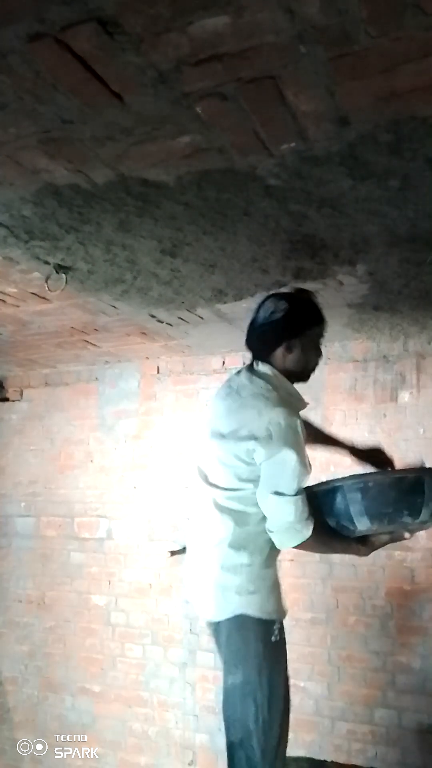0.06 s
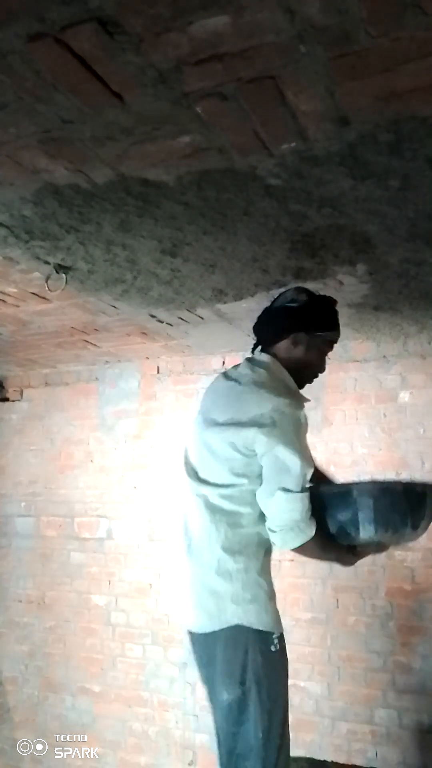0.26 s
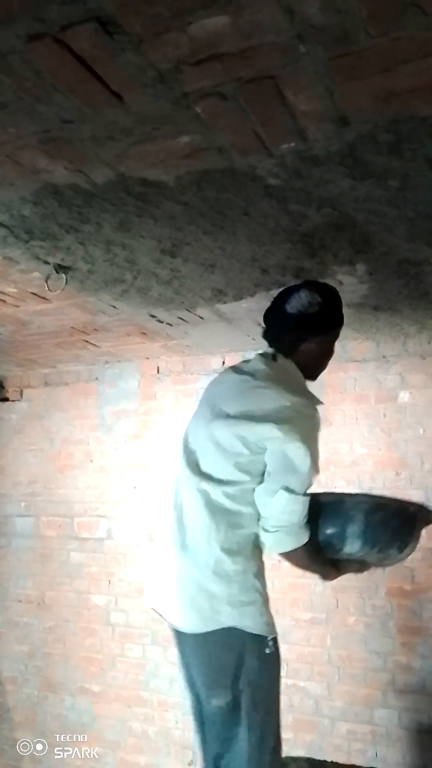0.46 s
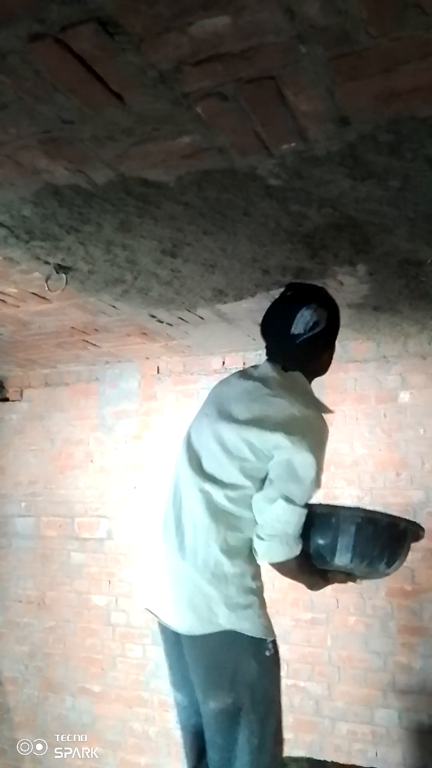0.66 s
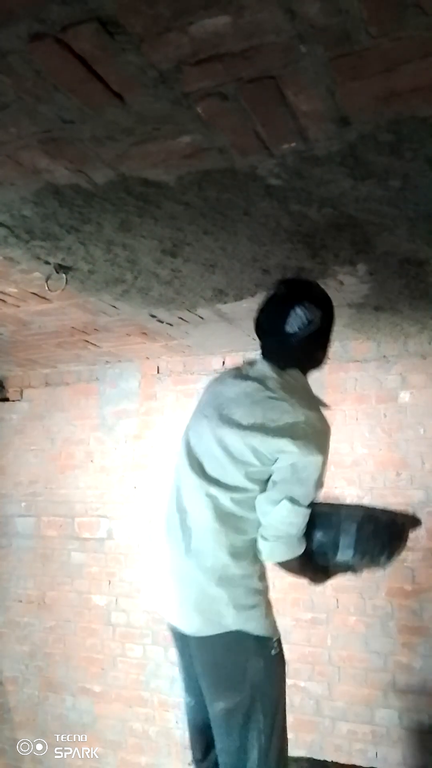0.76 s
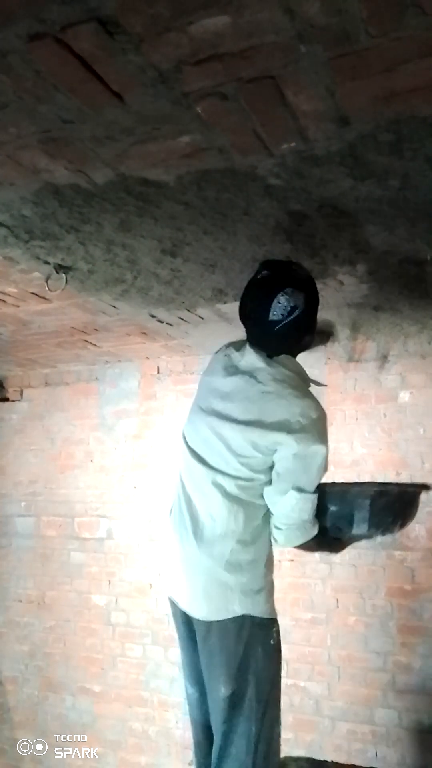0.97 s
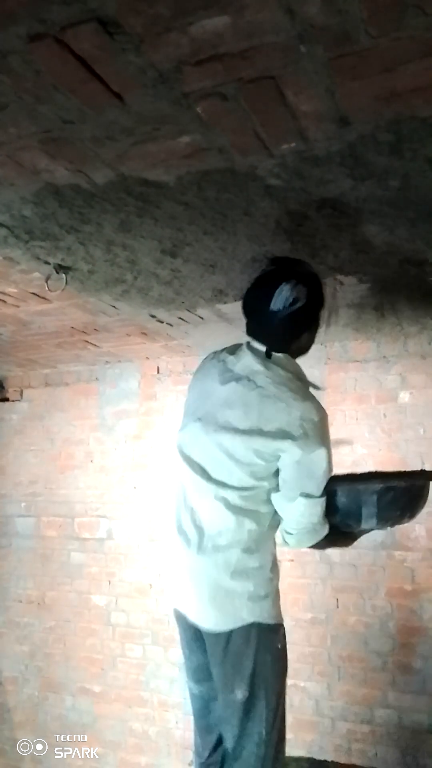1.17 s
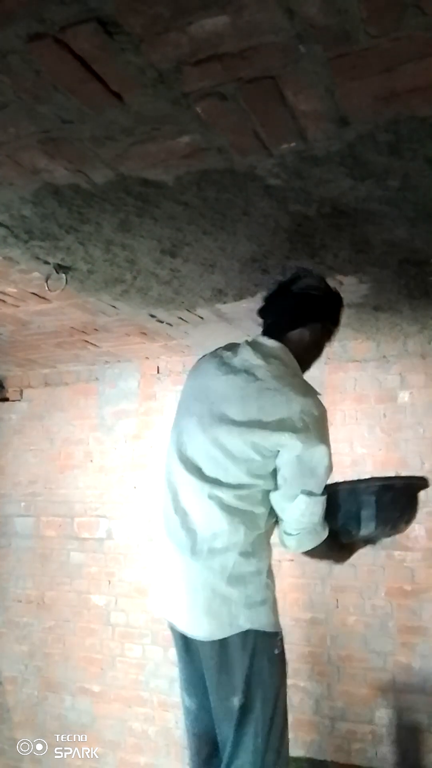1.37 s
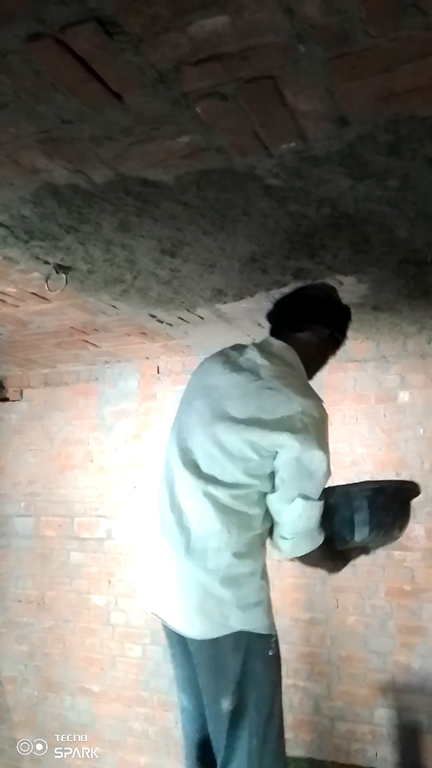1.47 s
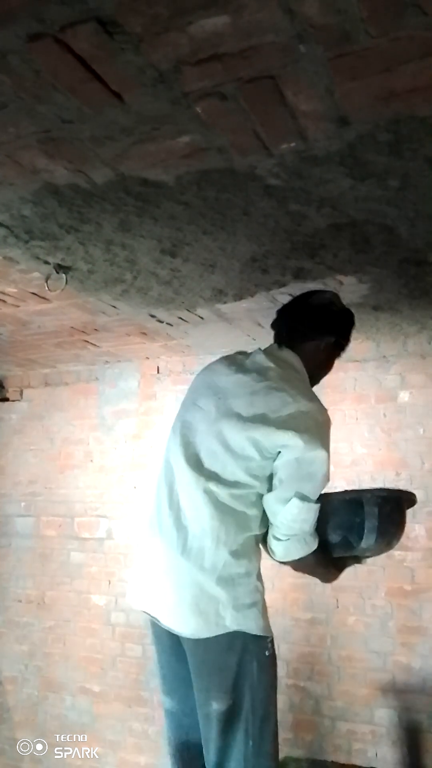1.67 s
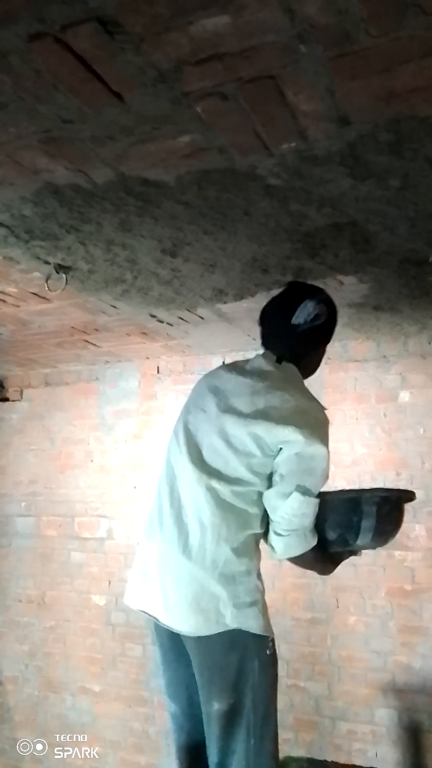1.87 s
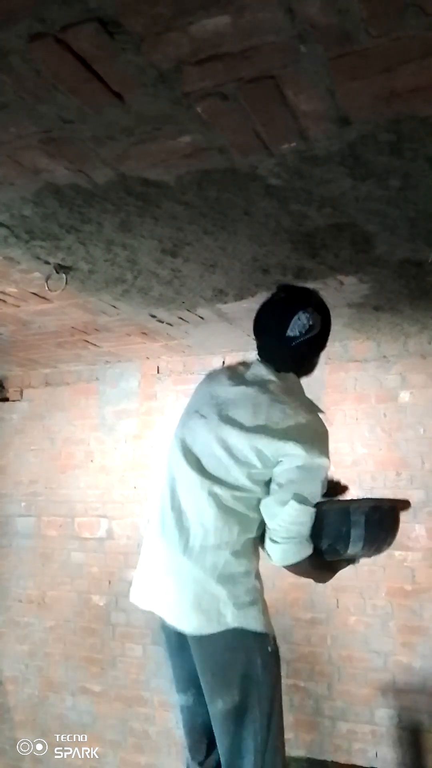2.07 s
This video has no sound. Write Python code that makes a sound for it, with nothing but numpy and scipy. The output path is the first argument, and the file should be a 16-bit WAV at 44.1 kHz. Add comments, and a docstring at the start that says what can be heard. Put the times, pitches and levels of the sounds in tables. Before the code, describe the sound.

Handfuls of mortar splat three times in a small brick room with a short echo. Grit and soft lumps rain down after the first and third, while a nearby hand scoops from a basin with knocks and light crunches.

```python
"""In a small brick room, a hand digs gritty mortar from a basin and flings it at the ceiling.
The first clump bursts with a short splat, and loose grit and soft lumps rain on the floor.
The hand digs for more, with hollow knocks and a little crunch. A second clump hits at about
1 s and a third lands at 1.4 s. Another shower falls and thins out while the hand digs again."""
import sys
import numpy as np
from scipy import signal
from scipy.fft import rfft, irfft
from scipy.io import wavfile

SR = 44100
rng = np.random.default_rng(int(sys.argv[2]) if len(sys.argv) > 2 else 0)


def bounce(signal):
    """Save signal as a 16-bit WAV file at the path given by the first command-line argument."""
    frames = np.transpose(np.atleast_2d(signal))
    limited = np.clip(frames, -1, 1)
    pcm = np.round(limited * 32767).astype(np.int16)
    wavfile.write(sys.argv[1], SR, pcm)


N = 92610
T = np.arange(N) / SR
HIT_HOLD_S = 0.0041   # how long a crack, thud or crumble stays at full strength


def from_db(db):
    """Turn decibels into a number to multiply by."""
    return 10 ** (np.asarray(db) / 20)


def rms_one(x):
    """Scale a sound to an average power of 1."""
    return x / np.sqrt(np.mean(x ** 2) + 1e-20)


def colour(x, tone):
    """Shape a sound with a table of pitches and relative levels; white noise keeps its power."""
    size = 4096
    hz, db = np.transpose(tone)
    log_pitch = np.log(np.fft.rfftfreq(size, 1 / SR) + 1)
    gain = rms_one(from_db(np.interp(log_pitch, np.log(hz), db)))
    # a minimum-phase filter: nothing rings before the hit
    cepstrum = irfft(np.log(gain))
    fold = 1 + np.sign(size / 2 - np.arange(size)) * (np.arange(size) > 0)
    response = irfft(np.exp(rfft(cepstrum * fold)))
    return signal.fftconvolve(x, response)[:N]


def keep_side(x, side, hz, order=2):
    """Keep the "low" or "high" side of a pitch; a higher order cuts more sharply."""
    return signal.sosfilt(signal.butter(order, hz, side, fs=SR, output="sos"), x)


def grains(per_s, spread_db):
    """Tiny random hits of uneven size, with an average power of 1."""
    chance = np.clip(per_s / SR, 1e-5, 1)
    sizes = rms_one(from_db(spread_db * np.minimum(rng.exponential(1, N), 4)))
    return sizes * rng.choice([-1, 1], N) * (rng.random(N) < chance) / np.sqrt(chance)


def burst(start_s, rise_s, hold_s, fade_s):
    """Loudness that rises, holds and dies away. A fade time is the time to fall by 60 dB."""
    rise = np.clip((T - start_s) / rise_s, 0, 1)
    return rise * from_db(-60 * np.maximum(T - start_s - hold_s, 0) / fade_s)


def resonate(x, hz, width_hz):
    """Let a sound ring around one pitch."""
    return signal.lfilter(*signal.iirpeak(hz, hz / width_hz, fs=SR), x + 1e-18)


# Tone of the background: pitch_hz, level_db
BACKGROUND_TONE = [(25, -19), (60, -23), (140, -22), (280, -1), (600, -4.5), (1200, -15.5), (2500, -26),
                   (4500, -23), (7000, -14.5), (15500, -17.5)]

def background():
    """A faint, steady rush of noise."""
    return from_db(-50.5) * colour(rng.standard_normal(N), BACKGROUND_TONE)


def tail(fade_s):
    """Countless echoes from one spot blur into a fading tail."""
    t = T[:SR // 2]
    echoes = rng.standard_normal(len(t)) * (t > .006) * from_db(-60 * t / fade_s)
    return echoes / np.linalg.norm(echoes)


def wandering_tail(x, fade_s, spots=24):
    """Mortar lands in ever new spots, and each spot gives the echoes a different tone."""
    out, step = np.zeros(2 * N), N // (spots - 1)
    for spot in range(spots):
        start = max(spot - 1, 0) * step
        part = x[start:(spot + 1) * step]
        position = (start + np.arange(len(part))) / step
        share = np.sqrt(np.clip(1 - np.abs(position - spot), 0, 1))
        echoes = signal.fftconvolve(part * share, tail(fade_s))
        out[start:start + len(echoes)] += echoes
    return out[:N]


def near_echoes(x, count=5):
    """Nearby walls and the ceiling bounce the treble back within a few milliseconds."""
    response = np.zeros(SR // 100)
    delays = (rng.uniform(.0008, .0045, count) * SR).astype(int)
    response[delays] = from_db(-7) * rng.choice([-1, 1], count) / np.sqrt(count)
    return x + signal.fftconvolve(keep_side(x, "high", 2500), response)[:N]


# Notes that build up between the walls: pitch_hz, gain_db, width_hz
ROOM_NOTES = [(235.6, 5.5, 12), (286.3, -1.5, 13), (354, -2.5, 14.6), (408.7, -2, 12), (582, -14.5, 8.3),
              (770, -41, 8.3)]

def room(x, split_hz=6500, count=16):
    """Bare brick adds hard echoes in the treble, fading tails, and ringing notes of its own."""
    low, high = keep_side(x, "low", split_hz), keep_side(x, "high", split_hz)
    response = from_db(-7) * tail(fade_s=0.25)
    delays = (rng.uniform(.003, .022, count) * SR).astype(int)
    response[delays] += from_db(-16.5) * rng.choice([-1, 1], count) / np.sqrt(count)
    low_echoes = from_db(-7) * wandering_tail(low, fade_s=0.3)
    heard = from_db(-1.57) * x + low_echoes + signal.fftconvolve(high, response)[:N]
    return heard + sum(from_db(db) * resonate(heard, hz, width) for hz, db, width in ROOM_NOTES)


# Booms in the brickwork: start_s, level_db
BOOMS = [(0.2, -62), (0.375, -59), (0.985, -61), (1.3, -80), (1.66, -87)]
# Tone of a boom: pitch_hz, level_db
BOOM_TONE = [(20, -2), (50, -22), (120, -0.5), (170, -6), (500, -29.5)]

def booms():
    """The brickwork answers heavy hits with a faint, deep rumble."""
    level = sum(from_db(db) * burst(start, 0.0036, 0, fade_s=0.86) for start, db in BOOMS)
    return colour(level * rng.standard_normal(N), BOOM_TONE)


# Finger pushes: start_s, swell_s, fine_db, rasp_db, fade_s
CRUNCHES = [(0.089, 0.051, -34.5, -42, 0.11), (0.8405, 0.0016, -38, -44, 0.025),
            (1.3014, 0.003, -41.5, -43, 0.066), (1.312, 0.032, -41.5, -44.5, 0.11),
            (1.406, 0.021, -48, -27.5, 0.38), (1.92, 0.029, -38, -39.5, 0.66)]
# Tone of fine grit, here and in the showers: pitch_hz, level_db
GRIT_TONE = [(400, -25), (1200, -21), (2000, -10.5), (2800, -5.5), (4000, -1.5), (5200, 1), (6800, 5.5),
             (8200, 4.5), (9800, 2), (11300, 0), (14000, 1.5), (15800, -1.5)]
# Tone of coarse grit: pitch_hz, level_db
RASP_TONE = [(300, -28), (1000, 13), (1600, 3), (3500, 1.5), (6000, -1.5), (15000, -4.5)]

def crunches():
    """Fingers push through the mortar: fine grit hisses, coarse grit rasps."""
    fine = coarse = 0
    for start, swell_s, fine_db, rasp_db, fade_s in CRUNCHES:
        push = burst(start, swell_s, swell_s, fade_s)
        fine += from_db(fine_db) * push
        coarse += from_db(rasp_db) * push
    hiss = colour(fine * grains(per_s=2400, spread_db=4.5), GRIT_TONE)
    return hiss + colour(coarse * rng.standard_normal(N), RASP_TONE)


# Digging strokes: start_s, length_s, level_db, pitch_hz
DIGS = [(0.0, 0.025, -53, 950), (0.086, 0.077, -34.5, 770), (0.561, 0.04, -32.5, 600),
        (0.608, 0.055, -32.5, 800), (0.699, 0.036, -36, 517), (1.299, 0.24, -37.5, 854),
        (1.772, 0.105, -35, 610)]
# Tone of the hollow basin: pitch_hz, level_db
BASIN_TONE = [(100, -66), (200, -26), (280, 18), (450, 6.5), (700, 12.5), (1000, 8), (1450, 11),
              (2100, 0.5), (5000, 8.5)]
# Single knocks on the basin: start_s, level_db, pitch_hz
KNOCKS = [(0.5795, -18.5, 614), (0.587, -23, 350), (0.6095, -21, 633), (0.622, -24, 590), (0.634, -19, 620),
          (0.6825, -21.5, 602), (0.701, -24, 363), (0.757, -29, 584), (1.3035, -35.5, 700),
          (1.316, -26, 707), (1.335, -31, 765), (1.344, -25, 766), (1.364, -33, 735), (1.808, -20.5, 596),
          (1.832, -27, 387), (1.865, -22, 560), (1.893, -28.5, 380)]
# The notes in one knock: pitch_ratio, level_db, fade_s
KNOCK_NOTES = [(0.53, -10, 0.028), (1, 0.5, 0.032), (1.55, -13.5, 0.044), (2.1, -29, 0.011)]

def basin():
    """The digging hand bumps the hollow basin; each knock sets a few short notes ringing."""
    out = 0
    for start, length_s, db, hz in DIGS:
        stroke = burst(start, 0.011, length_s, fade_s=0.17)
        bumps = resonate(grains(per_s=850, spread_db=1), hz, width_hz=hz / 1.5)
        out += from_db(db) * stroke * rms_one(colour(bumps, BASIN_TONE))
    for start, db, hz in KNOCKS:
        for ratio, note_db, fade_s in KNOCK_NOTES:
            ring = np.sin(2 * np.pi * hz * ratio * (T - start))
            level = from_db(db + note_db + rng.normal(0, 1.4))
            out += level * burst(start, 0.0014, 0.0022, fade_s) * ring
    return out


# Bigger clods landing in the showers: start_s, thud_db, crumbs_db, pitch_hz
CLODS = [(0.375, -24, -11, 397), (0.3975, -19.5, -14, 650), (0.429, -19.5, -11.5, 291),
         (0.469, -29.5, -34, 243), (0.526, -29.5, -40, 228), (1.609, -18, -32, 540), (1.626, -25, -25, 395),
         (1.696, -23, -35, 386), (1.746, -35, -28, 395)]
# Tone of the crumbs: pitch_hz, level_db
CRUMB_TONE = [(2500, -34), (5500, -27), (7500, 2), (15000, 8.5)]

def clods():
    """A clod lands with a dull thud at a pitch of its own, and crumbles."""
    thuds = crumbs = 0
    for start, thud_db, crumbs_db, hz in CLODS:
        body = rms_one(resonate(grains(per_s=2500, spread_db=0), hz, width_hz=hz / 4))
        thuds += from_db(thud_db) * burst(start, 0.0024, 0, fade_s=0.095) * body
        crumbs += from_db(crumbs_db) * burst(start, 0.00069, HIT_HOLD_S, fade_s=0.05)
    dull = keep_side(thuds, "low", 1400, order=3)
    return dull + colour(crumbs * rng.standard_normal(N), CRUMB_TONE)


def tinks(flow, per_s=1400, fade_s=0.028, tries=5000):
    """Some hard grains ring briefly as they land, each at a high pitch of its own."""
    out, t = np.zeros(N + SR), T[:SR // 10]
    for when, luck, pitch, size in rng.random((tries, 4)):
        if luck < per_s * N / SR / tries:
            start, hz = int(when * N), 6000 + 9500 * pitch
            level = flow[start] * from_db(3.75 + 5 * size - 60 * t / fade_s)
            out[start:start + len(t)] += level * np.sin(2 * np.pi * hz * t)
    overlap_scale = np.sqrt(4 * np.log(1000) / per_s / fade_s)
    return from_db(-11.5) * overlap_scale * out[:N]


# How strongly mortar falls, one list per shower: time_s, grit_db, lumps_db
SHOWERS = [
    [(0.22, -33, -34), (0.264, -24, -41), (0.346, -21.5, -32), (0.372, -22, -33), (0.41, -15, -29),
     (0.436, -19, -31.5), (0.55, -31.5, -42), (0.7, -34, -38), (0.82, -47, -49.5), (0.955, -45.5, -44.5),
     (0.97, -34, -58)],
    [(1.56, -38.5, -40.5), (1.602, -17, -26.5), (1.626, -19.5, -31.5), (1.676, -22, -34.5),
     (1.7, -18, -28.5), (1.758, -24, -30.5), (1.784, -27, -42), (1.864, -29.5, -37.5), (1.926, -37.5, -43),
     (2.048, -43, -48.5), (2.1, -57, -54)],
]
# Tone of the soft lumps: pitch_hz, level_db
LUMP_TONE = [(60, -50), (150, -67), (200, -27.5), (260, -6), (380, -0.5), (620, -1.5), (850, -7),
             (1400, -8), (2000, -21.5), (4000, -31.5)]

def showers(edge_s=0.0043, full_flow_db=-17.5, lump_boost_db=3):
    """Grit and soft lumps rain on the floor; a stronger flow brings more grains."""
    grit_flow = lump_flow = 0
    for rows in SHOWERS:
        times, grit_db, lumps_db = np.transpose(rows)
        falling = np.clip(1 + np.minimum(T - times[0], times[-1] - T) / edge_s, 0, 1)
        grit_flow += falling * from_db(np.interp(T, times, grit_db))
        lump_flow += falling * from_db(np.interp(T, times, lumps_db) + lump_boost_db)
    busy = (grit_flow / from_db(full_flow_db) + 0.0009) ** 0.65
    grit = colour(grit_flow * grains(per_s=20000 * busy, spread_db=0.8), GRIT_TONE)
    grit += tinks(grit_flow)
    return grit + colour(lump_flow * grains(per_s=700, spread_db=1.5), LUMP_TONE)


# Clumps splatting as they hit or land:
# start_s, crack_db, spray_db, thud_db, pitch_hz, lead_in_s, spray_fade_s
SPLATS = [(0.204, -13.5, -23, -29, 1330, 0.047, 0.49), (0.994, -18, -20.5, -33, 840, 0.049, 0.35),
          (1.447, -17.5, -20.5, -26, 910, 0.06, 0.51)]
# Tone of the thud: pitch_hz, level_db
THUD_TONE = [(100, -38), (180, -14), (300, 12.5), (450, 13.5), (800, 6), (1050, -13.5), (1350, 9),
             (2000, -2.5), (4000, -5)]
# Tone of the spray: pitch_hz, level_db
SPRAY_TONE = [(200, -13), (1000, -0.5), (2200, -12.5), (3200, -9), (5000, -7), (7200, 0.5), (10000, -5),
              (15500, -5)]

def splats():
    """Stray grains arrive first, then the clump thuds and sprays apart."""
    spray = thuds = 0
    for start, _, spray_db, thud_db, hz, lead_in_s, spray_fade_s in SPLATS:
        strays = from_db(-4 - 30 * np.abs(start - T) / lead_in_s) * (T < start)
        ring = resonate(grains(per_s=3800, spread_db=0.5), hz, width_hz=hz / 1.4)
        body = rms_one(colour(ring, THUD_TONE))
        spray += from_db(spray_db) * (strays + burst(start, 0.0012, 0, spray_fade_s))
        thuds += from_db(thud_db) * (strays + burst(start, 0.0013, HIT_HOLD_S, fade_s=0.38)) * body
    return thuds + colour(spray * grains(per_s=4500, spread_db=0.8), SPRAY_TONE)


# Tone of the crack in each splat: pitch_hz, level_db
CRACK_TONE = [(300, -23), (1200, 7.5), (2200, -9), (4500, 0.5), (7500, -5.5), (11000, -4.5), (15000, 4.5)]

def cracks():
    """Each clump hits with one crisp crack, a few milliseconds long."""
    level = sum(from_db(db) * burst(start, 0.00097, HIT_HOLD_S, fade_s=0.01) for start, db, *_ in SPLATS)
    return colour(level * rng.standard_normal(N), CRACK_TONE)


def scene():
    """All the hits share the room and a faint background, the same in both channels."""
    hits = cracks() + near_echoes(splats() + showers() + clods() + basin() + crunches())
    hits = keep_side(hits, "high", 211, order=6)   # small hits carry no deep bass
    mono = room(hits + booms()) + background()
    return np.array([mono, mono])


def record(dry, cutoff_hz=15800):
    """The very highest treble is cut off steeply."""
    return signal.sosfilt(signal.ellip(12, .1, 80, cutoff_hz, fs=SR, output="sos"), dry)


dry = scene()
out = record(dry)
bounce(out)
```